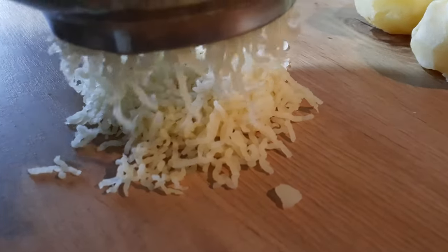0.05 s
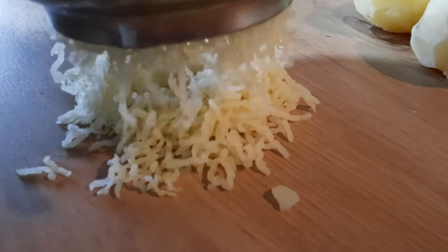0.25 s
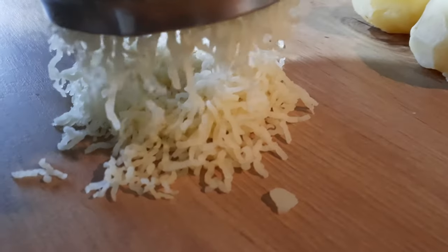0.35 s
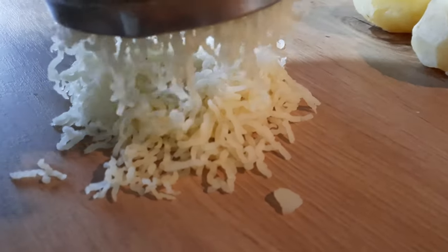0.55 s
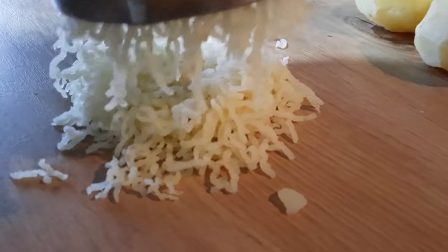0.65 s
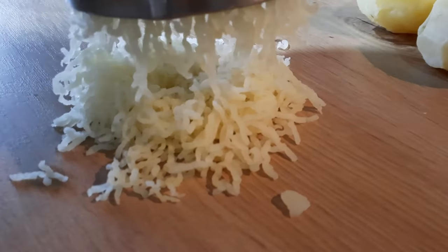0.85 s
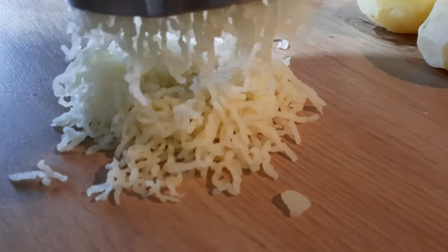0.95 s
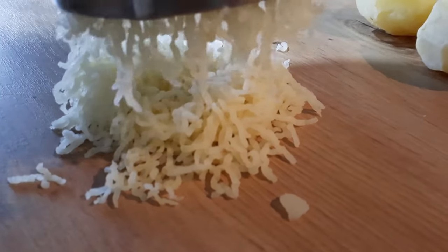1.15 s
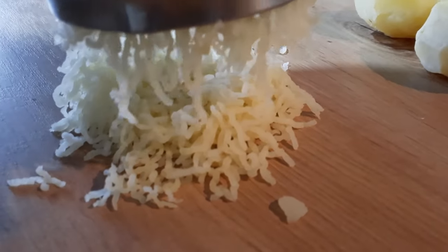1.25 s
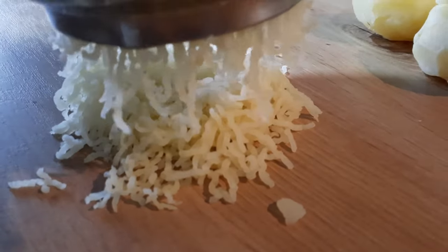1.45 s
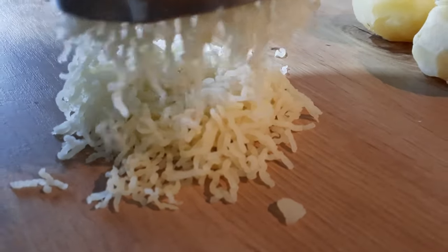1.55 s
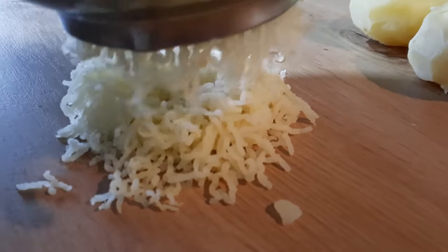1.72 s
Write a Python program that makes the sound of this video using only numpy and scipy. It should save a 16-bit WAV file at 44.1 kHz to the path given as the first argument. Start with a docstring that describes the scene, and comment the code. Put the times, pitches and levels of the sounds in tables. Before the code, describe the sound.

A hand-cranked food mill makes one turn, close up in a small kitchen: a few wet ticks, then low grinding, ringing metal chatter and fine rasp, a sharp snap to a stop, and faint last ticks.

```python
"""Small kitchen, stereo microphone close to a hand-cranked food mill as it makes one turn.
Dense random contacts give a low grind in the bowl, a chatter of slips ringing the plate and a fine metal rasp.
Short noise bursts give wet potato ticks before, during and after, dull low knocks, a ring of the bowl
and the blade's snap to a stop. A faint crackle runs throughout;
filtered noise and a wavering 100 Hz sine are the room air and its mains hum."""
import sys
import numpy as np
from scipy import signal
from scipy.fft import rfft, irfft
from scipy.io import wavfile

SR = 44100
rng = np.random.default_rng(int(sys.argv[2]) if len(sys.argv) > 2 else 0)


def generate_wav(sig):
    """Save sig (samples, or channels by samples) to the path in sys.argv[1] as 16-bit PCM at SR."""
    pcm = np.round(np.clip(np.atleast_2d(sig).T, -1, 1) * 32767).astype(np.int16)
    wavfile.write(sys.argv[1], SR, pcm)


def natural_amplitude(level_db):
    """Convert a level in decibels to a linear amplitude factor, elementwise."""
    exponent = np.asarray(level_db, float) / 20
    return 10 ** exponent


N = 79380

# shared ring of ticks, crackle and stop: (centre [Hz], width [Hz], relative level [dB])
TICK_BODY = [(7940, 1100, -0.5), (2390, 900, -11), (15200, 3800, -5.0)]


def rms_one(x):
    """Scale to rms 1."""
    return x / np.sqrt(np.mean(x ** 2) + 1e-20)


def in_time(rows):
    """Columns of a curve over time, sample by sample."""
    s, *columns = np.transpose(rows)
    return [np.interp(np.arange(N) / SR, s, c) for c in columns]


def at_hz(points):
    """A table read along log frequency at every bin of a padded spectrum."""
    hz = np.maximum(np.arange(N + 1) * SR / (2 * N), 1)
    table_hz, values = np.array(points).T
    return np.interp(np.log(hz), np.log(table_hz), values)


def through(x, response):
    """Filter by a response on the padded spectrum."""
    return irfft(rfft(x, 2 * N) * response)[..., :N]


def drift(rate_hz):
    """Slow random wander of rms 1: noise through a two-pole low-pass."""
    r = np.exp(-2 * np.pi * rate_hz / SR)
    wander = signal.lfilter([1], [1, -2 * r, r * r], rng.standard_normal(N + SR))
    return rms_one(wander[SR:])  # the filter has settled by here


def grains(per_s, spread_db, clump_db, clump_hz):
    """Random clicks in clumps, at three places of contact: one heard on both sides, one left, one right."""
    sizes = natural_amplitude(spread_db * np.minimum(rng.exponential(1, (3, N)), 4))
    signs = rng.choice([-1, 1], (3, N))
    struck = rng.random((3, N)) < per_s / SR
    return sizes * signs * struck * natural_amplitude(clump_db * drift(clump_hz))


def resonate(x, peaks, wander_db=0):
    """Parallel two-pole resonances; each may swell and fade as the contact moves."""
    out = 0
    for k, (hz, width_hz, db) in enumerate(peaks):
        r = np.exp(-np.pi * max(width_hz, 5) / SR)
        gain = natural_amplitude(db + wander_db * drift(3.1)) if wander_db else natural_amplitude(db)
        zeros = [(1 - r * r) / 2, 0, (r * r - 1) / 2]
        poles = [1, -2 * r * np.cos(2 * np.pi * hz / SR), r * r]
        out = out + (-1) ** k * signal.lfilter(zeros, poles, gain * x + 1e-18)
    return out


def bursts(events, shape):
    """Dying noise bursts (time [s], peak [dB], t60 [s], ..), each shaped and set to its peak."""
    out, t = np.zeros((3, N + SR)), np.arange(SR // 10) / SR
    for s, db, t60, *more in events:
        noise = rng.standard_normal((3, len(t))) * natural_amplitude(-60 * t / max(t60, .002))
        burst = shape(noise, *more)
        start = int(s * SR)
        out[:, start:start + len(t)] += natural_amplitude(db) * burst / np.abs(burst).max(axis=1, keepdims=True)
    return out[:, :N]


def bite(rest_db):
    """Gain that creeps at a low rest level, then rises in a straight line to 1 as the crank bites."""
    start_s, rise_s = .2005, .004
    return np.clip((np.arange(N) / SR - start_s) / rise_s, natural_amplitude(min(rest_db, 0)), 1)


def air():
    """Room air: coloured noise, partly alike on both sides, quieter for its first 40 ms."""
    # spectrum of the air: (frequency [Hz], relative level [dB])
    air_colour = [(21, -28), (35, 1), (118, -11), (312, -2), (602, -8.5), (967, -7.5), (1260, -33),
                  (1550, -21), (2630, -37), (3430, -49), (7750, -19.5), (9570, -51), (17500, -11.5),
                  (19000, -33)]
    # left-right correlation of the air: (frequency [Hz], likeness [0-1])
    likeness = [(30, 0.1), (150, 0.48), (500, 0.68), (2000, 0.076), (12000, .1)]
    mid, side = rng.standard_normal((2, N))
    alike, colour = np.clip(at_hz(likeness), 0, 1), natural_amplitude(at_hz(air_colour))
    mid = through(mid, colour * np.sqrt(1 + alike))
    side = through(side, colour * np.sqrt(1 - alike))
    hiss = rms_one(mid + side * [[1], [-1]])
    early = np.arange(N) / SR < .04
    return natural_amplitude(-54.5 - 5 * early + 1.2 * drift(9.3)) * hiss


def hum():
    """Mains hum: a 100 Hz sine with wandering phase and a wavering level."""
    # hum over time: (time [s], rms level [dB])
    hum_level = [(0, -70), (.2, -59.5), (.49, -60), (.55, -68), (.67, -66), (.71, -61), (1.05, -59.5),
                 (1.37, -72), (1.43, -61)]
    phase = 2 * np.pi * 100 * np.arange(N) / SR + 0.6 * drift(5.8)
    return np.sqrt(2) * np.sin(phase) * natural_amplitude(*in_time(hum_level))


def crackle():
    """Wet mash parting: sparse random clicks ring broad resonances throughout."""
    clicks = grains(500, spread_db=4.0, clump_db=4.0, clump_hz=24)
    rings = resonate(clicks, TICK_BODY + [(12400, 1000, -1.1), (4300, 1800, -2)])
    return natural_amplitude(-67) * rms_one(rings)


def tick_ring(burst, hz):
    """Broad ring of a tick with its own bright centre."""
    return resonate(burst, [(hz, 3000, 0)] + TICK_BODY)


def ticks():
    """Sharp wet potato ticks: short noise bursts, each broad with a bright ring."""
    # single ticks: (time [s], peak before the room [dB], centre [Hz])
    tick_rows = [(.021, -46, 12000), (.0405, -33, 13500), (.0448, -35, 7600), (.0745, -43, 7700),
                 (.089, -41, 15000), (.147, -45, 14000), (.161, -39, 13000), (.3415, -29, 14000),
                 (.365, -33, 8200), (.399, -30, 8000), (.5272, -24, 6550), (.70, -32, 7570),
                 (1.4343, -27, 6110), (1.4806, -22, 12000), (1.584, -42, 16000), (1.61, -43, 13200),
                 (1.687, -49, 14000), (1.729, -47, 5500)]
    t60_s = .007  # of the burst that excites the ring
    return bursts([(s, db, t60_s, hz) for s, db, hz in tick_rows], tick_ring)


def grind():
    """Dull contacts through the mash, broad, with the bowl ringing faintly."""
    # drag of the blade through the mash: (time [s], relative level [dB])
    drag = [(0.208, -56.5), (0.22, -44.5), (0.406, -44), (0.42, -38), (0.518, -42.5), (0.53, -33.5),
            (0.552, -43), (0.598, -39.5), (0.762, -43), (0.886, -41.5), (1.054, -47.5), (1.272, -41.5),
            (1.328, -46.5), (1.386, -41), (1.524, -41), (1.618, -58), (1.8, -71)]
    # spectrum of the drag: (frequency [Hz], relative level [dB])
    grind_colour = [(65, -61), (110, -6), (124, -16), (145, -4), (205, -11.5), (237, -2.5), (491, -6),
                    (811, 1.5), (1180, -5), (1770, 6), (1920, 1), (2310, -0.5), (2600, -31), (3380, -44)]
    # resonances of the bowl: (centre [Hz], width [Hz], relative level [dB])
    bowl = [(539, 29, -5), (701.7, 15.4, 4.5), (781.3, 23, 0), (837.5, 12.2, 8), (1473, 220, -9.5),
            (1598, 9.3, 7.5), (1825, 33, 0.5)]
    level_db, = in_time(drag)
    rub = grains(6000, spread_db=2.2, clump_db=1.2, clump_hz=60)
    broad = rms_one(through(rub, natural_amplitude(at_hz(grind_colour))))
    ringing = rms_one(resonate(rub, bowl, wander_db=1.3))
    return natural_amplitude(level_db) * rms_one(broad + natural_amplitude(-4.5) * ringing)


def chatter():
    """Bunched slips ring the close modes of the plate; the ringing spot travels round with the blade."""
    # blade slipping over the holes: (time [s], relative level [dB], left-right about its mean [dB])
    chatter_curve = [(0.208, -43, 9), (0.242, -37.5, 20), (0.26, -43, 18), (0.344, -48, 25),
                     (0.442, -35.5, 16), (0.49, -34.5, 7), (0.54, -29.5, 12), (0.576, -37.5, 0),
                     (0.614, -32.5, 5), (0.638, -41, 11), (0.762, -47, -6), (0.886, -42.5, -5),
                     (0.956, -49, 10), (0.974, -40.5, 3), (1.094, -51.5, 18), (1.196, -44, 10),
                     (1.294, -41, 3), (1.328, -52, 1), (1.368, -40, 17), (1.48, -38.5, -2),
                     (1.532, -38, 6.5), (1.542, -48, 19), (1.63, -67, 6), (1.8, -75, 31)]
    # modes of the plate: (centre [Hz], width [Hz], relative level [dB])
    plate = [(2150, 60, 0), (2270, 70, 1), (2348, 50, 7), (2420, 60, 2), (2530, 110, -1), (2760, 160, -9)]
    # the hardest slips: (time [s], peak before panning, mill gain and room [dB])
    hard_slips = [(.372, -36), (.399, -33), (.408, -34), (.415, -33), (.4225, -25), (.4325, -30),
                  (.4405, -27), (.4475, -25), (.456, -28), (.465, -29), (.4695, -28), (.476, -28),
                  (.506, -26), (.522, -28), (.530, -25), (.5355, -23), (.541, -30), (.567, -26),
                  (.580, -28), (.587, -29), (.613, -28), (.617, -28), (1.370, -32), (1.395, -32)]
    # plate under a hard slip, damped by the blade: (centre [Hz], width [Hz], relative level [dB])
    slip_ring = [(2340, 130, 0), (2160, 150, -9), (2500, 150, -10)]
    level_db, pan_db = in_time(chatter_curve)
    slips = grains(1400, spread_db=2.5, clump_db=1.8, clump_hz=90)
    rings = rms_one(resonate(slips, plate, wander_db=1.2))
    hard = bursts([(s, db, .008) for s, db in hard_slips],  # burst t60 8 ms
                  lambda b: resonate(resonate(b, slip_ring), [(2310, 1000, 0)]))
    swing = natural_amplitude((pan_db - pan_db.mean()) / 2)
    return (natural_amplitude(level_db - 3.5) * rings + hard) * [np.ones(N), swing, 1 / swing]


def rasp():
    """Very fine, dense contacts of blade edge on plate; each range flickers a little on its own."""
    # metal on metal: (time [s], relative level 6-9 kHz [dB], 3-5 kHz against it [dB], top treble against it [dB])
    rasp_curve = [(0.208, -48.5, -11, 0.5), (0.242, -45, -3, 1.5), (0.304, -52, -3, 1),
                  (0.428, -42, -3.5, -2.5), (0.508, -46, 0, 1), (0.536, -37.5, -1, -4),
                  (0.548, -42.5, -3, 1), (0.814, -52.5, 0, 0), (0.908, -48, 1, 3), (0.996, -49, -5.5, 2.5),
                  (1.142, -52, -3, -4.5), (1.2, -47, -3.5, -1.5), (1.396, -44.5, -7, -4.5),
                  (1.418, -44.5, -3.5, -2), (1.44, -40.5, -6, -2.5), (1.48, -44.5, -3, 2.5),
                  (1.498, -34, -4.5, 0.5), (1.52, -43, -3, 2), (1.532, -40.5, -10, 5), (1.556, -52, -4, -6),
                  (1.67, -66, -8, -2), (1.8, -67, -14, -1)]
    # spectra of the three ranges: (frequency [Hz], relative level [dB])
    mid_colour = [(1650, -16.5), (2800, 1), (3740, -5.5), (4460, -4.5), (4830, -12.5), (5500, -27.5),
                  (7150, -85)]
    high_colour = [(3240, -23), (5500, -0.5), (6330, -2), (6910, 4), (7900, 8.5), (8300, 2.5), (9300, -19),
                   (12100, -75)]
    top_colour = [(7500, -23.5), (9500, -4), (10700, 0), (12300, -0.5), (14300, -3.5), (16500, -5),
                  (18300, -5.5), (18650, -20), (19100, -40)]
    # resonances of the blade: (centre [Hz], width [Hz], relative level [dB])
    blade = [(6140, 190, 1), (6520, 53, 8.5), (6700, 69, 3), (7610, 54, 15.5), (8080, 58, 4),
             (7890, 140, -6.5), (8450, 36, 5)]
    level_db, mid_db, top_db = in_time(rasp_curve)
    rub = grains(9000, spread_db=4.0, clump_db=1.5, clump_hz=32.4)
    out = natural_amplitude(level_db - 3.5) * rms_one(resonate(rub, blade, wander_db=3.5))
    for colour, db in ((mid_colour, mid_db), (high_colour, 0), (top_colour, top_db)):
        flicker_db = 0.24 * drift(36)
        out = out + natural_amplitude(level_db + db + flicker_db) * rms_one(through(rub, natural_amplitude(at_hz(colour))))
    return out


def knocks_and_bowl_ring():
    """Dull low knocks, and the bowl ringing up near 0.89 s: noise bursts through two equal resonances in series."""
    # low knocks, and the bowl's ring at 834 and 962 Hz: (time [s], peak before the room [dB], pitch [Hz])
    pitched_rows = [(0.453, -51.5, 130), (0.529, -57, 153), (.60, -53, 125), (.885, -40.5, 834),
                    (.89, -42, 962), (1.27, -60, 214)]
    t60_s = .051  # of the burst that excites the resonances

    def pitched(burst, hz):
        peak = [(hz, 45, 0)]
        return resonate(resonate(burst, peak), peak)

    return bursts([(s, db, t60_s, hz) for s, db, hz in pitched_rows], pitched)


def blade_stop():
    """The blade snaps to a stop, twice: noise bursts with the broad, bright ring of a tick."""
    # snaps: (time [s], peak before the room [dB], centre [Hz], burst t60 [s])
    snaps = [(1.5326, -12.5, 11400, .009), (1.5343, -15.5, 11600, .012)]
    return bursts([(s, db, t60, hz) for s, db, hz, t60 in snaps], tick_ring)


def kitchen(x):
    """The left and right microphones hear shared and own contacts, the shared ones earlier at left; then a room tail."""
    # contacts heard alike on both sides: (frequency [Hz], share of power [0-1])
    shared_part = [(100, 0.94), (400, 0.98), (1200, 0.54), (2400, 0.38), (5000, 0.21), (10000, 0.29)]
    # balance of the microphones: (frequency [Hz], left-right [dB])
    balance = [(60, 8), (120, -6), (240, 2), (480, 3.5), (950, 3.5), (1890, 5), (3770, 4), (7520, 1.5),
               (15000, 16.5)]
    left_lead_s, room_t60_s, room_db = 0.000348, 0.11, -11
    t = np.arange(SR // 2) / SR
    tail = rng.standard_normal((2, len(t))) * natural_amplitude(-60 * t / room_t60_s) * (t > .004)
    tail = tail / np.linalg.norm(tail[0])
    shared, side = np.clip(at_hz(shared_part), 0, 1), np.array([[.5], [-.5]])
    hz = np.arange(N + 1) * SR / (2 * N)
    lead = np.exp(2j * np.pi * hz * left_lead_s * side)
    room = natural_amplitude(side * at_hz(balance)) * (1 + natural_amplitude(room_db) * rfft(tail, 2 * N))
    return through(x[0], room * lead * np.sqrt(shared)) + through(x[1:], room * np.sqrt(1 - shared))


def scene():
    """The mill in the kitchen, over the air and hum."""
    background = air() + hum()
    wet = crackle() + ticks()
    mill = bite(-6) * grind() + bite(-18.5) * chatter() + bite(-16) * rasp()  # rest levels [dB]
    return kitchen(natural_amplitude(1.5) * mill + wet + knocks_and_bowl_ring() + blade_stop()) + background


def band_limit(x):
    """A steep low-pass at the top of the band."""
    return signal.sosfilt(signal.butter(12, 19130, fs=SR, output="sos"), x)


def record(dry):
    """Bass cut at 60 Hz; the upper treble narrows to a left-leaning mono and the very top is cut."""
    # stereo width: (frequency [Hz], gain of the side signal [dB])
    side_gain = [(11000, -1), (13600, -27.5), (13900, -36), (16900, -45), (17200, -4)]
    dry = signal.sosfilt(signal.butter(2, 60, "high", fs=SR, output="sos"), dry)
    mid, width = dry.mean(axis=0), natural_amplitude(at_hz(side_gain))
    side = through((dry[0] - dry[1]) / 2, width)
    lean = 0.19 * through(mid, 1 - np.minimum(width, 1))  # a share of mid where the side is narrowed
    stereo = mid + (side + lean) * [[1], [-1]]
    top_cut = signal.cheby2(12, 70, 19150, fs=SR, output="sos")
    return band_limit(signal.sosfilt(top_cut, stereo))


dry = scene()
out = record(dry)
generate_wav(out)
```